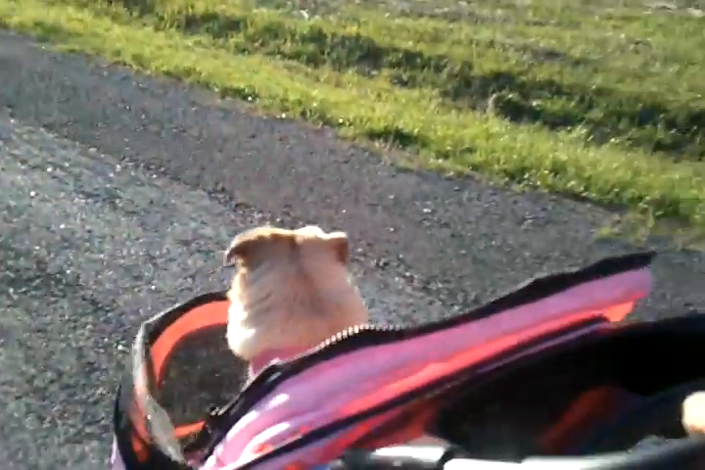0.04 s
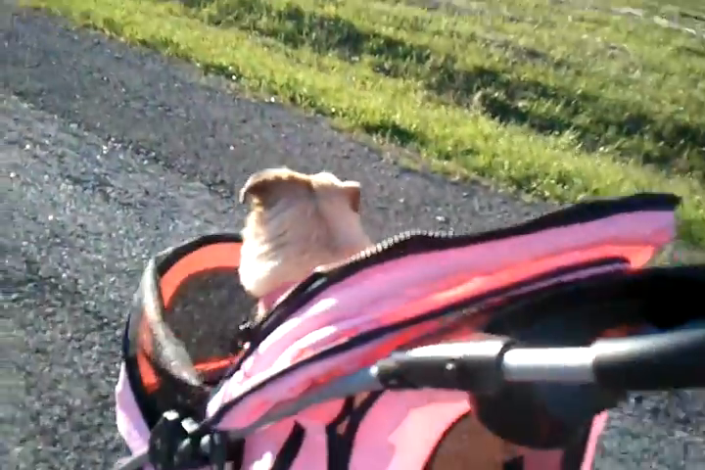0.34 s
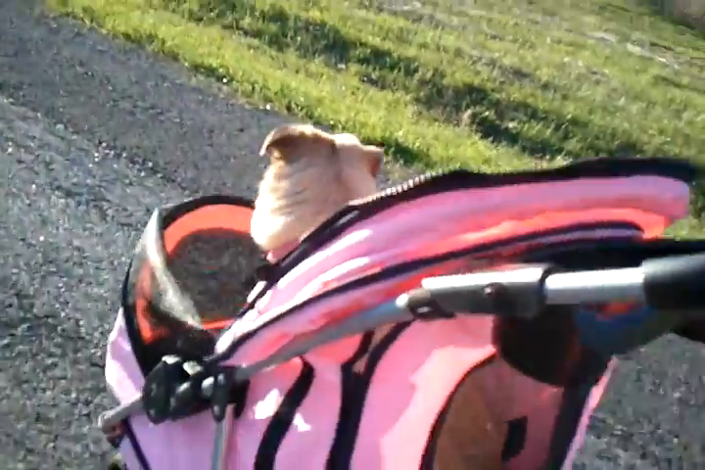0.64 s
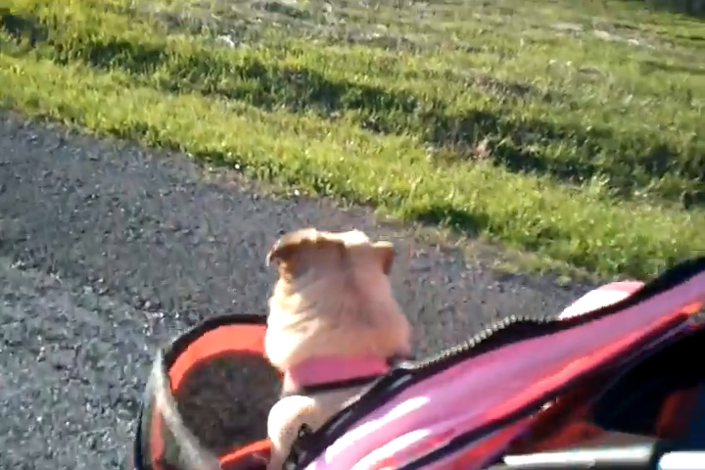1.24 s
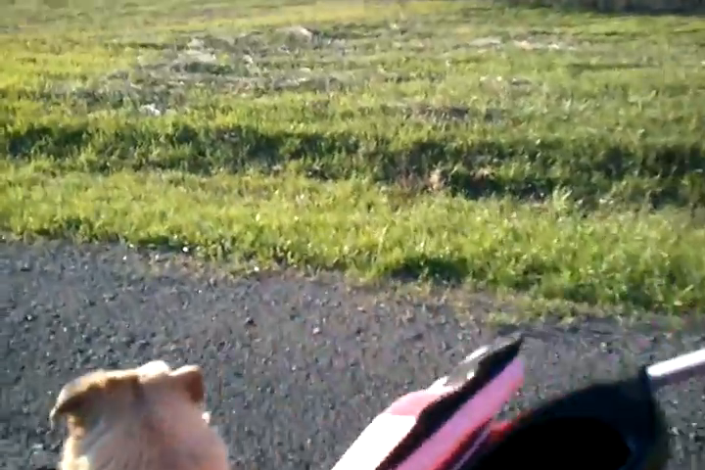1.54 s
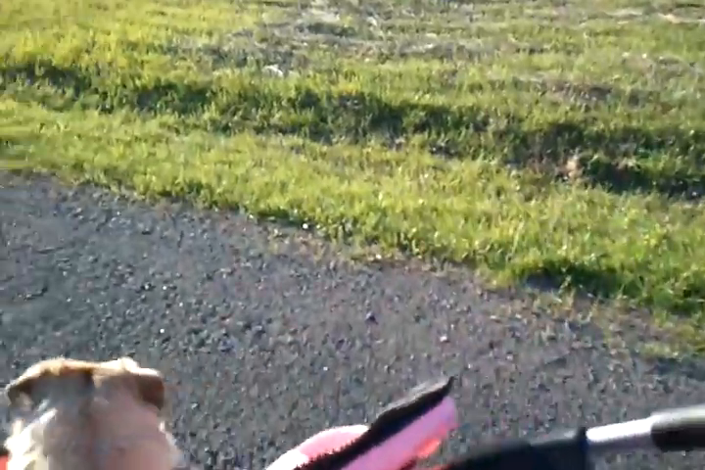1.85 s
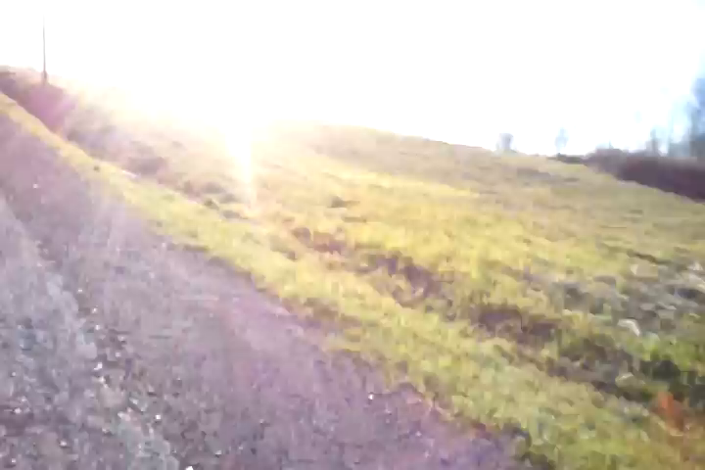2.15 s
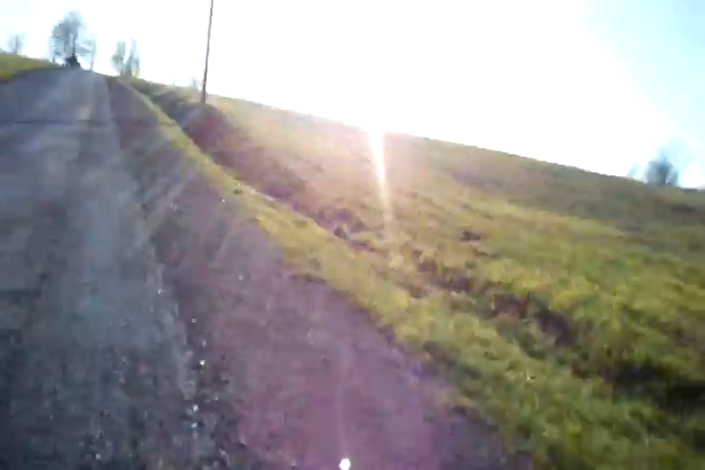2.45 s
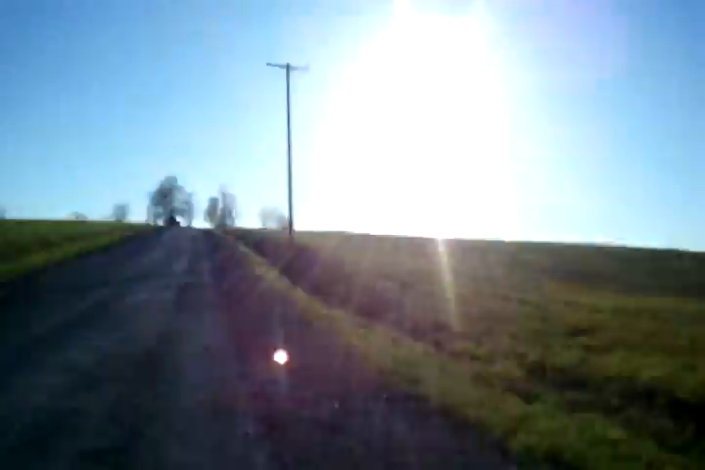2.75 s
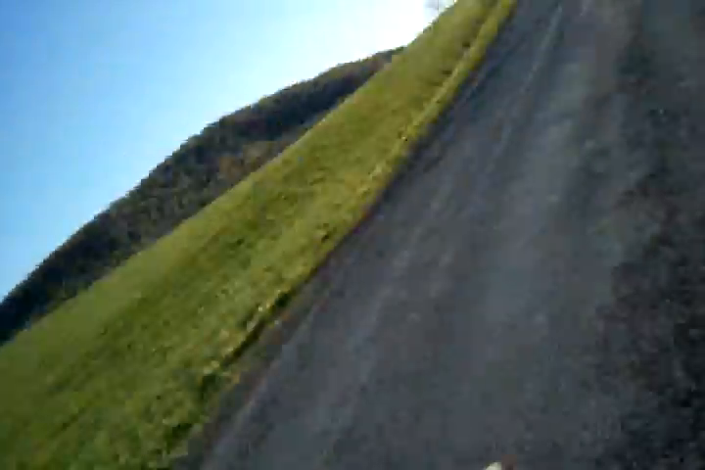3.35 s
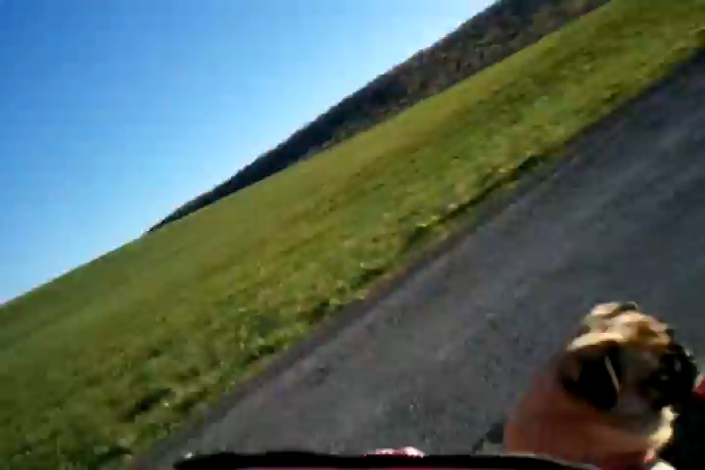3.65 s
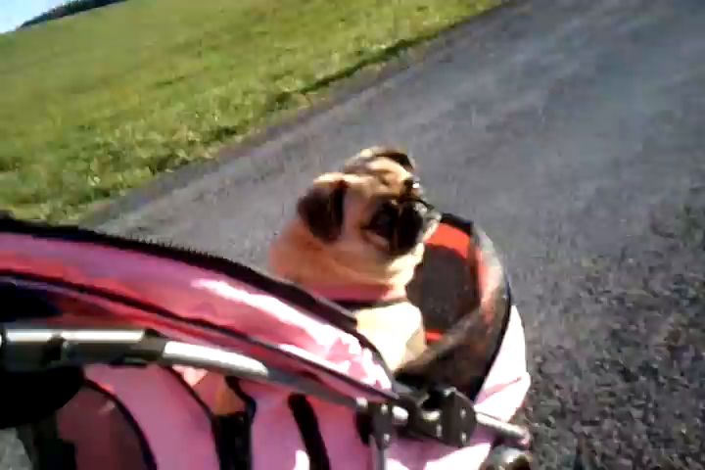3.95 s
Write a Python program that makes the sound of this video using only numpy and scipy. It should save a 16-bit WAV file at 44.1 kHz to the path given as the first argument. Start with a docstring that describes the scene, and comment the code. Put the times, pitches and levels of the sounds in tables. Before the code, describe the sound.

A stroller rumbles over a gravel road throughout, with grit crunching, plastic clacks, metal clinks and faint fabric rustles and squeaks. Wind buffets the microphone for the first half second. The wheels thud over stones from about 0.8 to 2.1 seconds. Gusts return with low pops from 2.3 to 3.7 seconds, the rattling grows busier around 3, and a sharp plastic clack comes near 3.8.

```python
"""A gravelly country road, with a stroller being pushed along it. Stones bump the wheels so the frame
rumbles, the tyres roar and grit crunches under them. Plastic joints clack and squeak, tubes knock,
a small metal fitting clinks, and the fabric hood rustles among short hollow scuffs.
Gusts buffet the microphone with low pops and flutter, and overload it."""
import sys
import numpy as np
from scipy import signal
from scipy.fft import rfft, irfft, next_fast_len
from scipy.io import wavfile
from scipy.ndimage import uniform_filter1d, map_coordinates

SR = 44100
rng = np.random.default_rng(int(sys.argv[2]) if len(sys.argv) > 2 else 0)


def wav_out(sig):
    """Save sig, one row per channel (or a flat mono array), as 16-bit PCM at SR to the path in sys.argv[1]."""
    wavfile.write(sys.argv[1], SR, np.round(np.clip(np.atleast_2d(sig).T, -1, 1) * 32767).astype(np.int16))


N = 176400

# Bright spectrum of a hard strike, on metal or plastic: freq_hz, gain_db
SNAP_EQ = [(200,-35),(1500,-10),(2800,-0.5),(4000,2),(5500,7),(7000,4.5),(9000,-33)]


def amp(db):
    """Decibels to gain."""
    return 10 ** (np.asarray(db) / 20)


def unit(x):
    """Scale to rms 1."""
    return x / np.sqrt(np.mean(x ** 2) + 1e-20)


def curve(rows):
    """One value per sample from (time_s, value) rows."""
    return np.interp(np.arange(N) / SR, *np.transpose(rows))


def wobble(rate):
    """A smooth random curve, rate knots a second."""
    return map_coordinates(rng.standard_normal(4000), [np.arange(N) * rate / SR], mode="wrap")


def arch(length_s):
    """A rounded fade in and out."""
    return np.sqrt(np.abs(np.hanning(int(length_s * SR))))


def filtered(x, response):
    """Filter x by a gain given as a function of frequency."""
    size = next_fast_len(len(x) + 8192)
    return irfft(rfft(x, size) * response(np.fft.rfftfreq(size, 1 / SR)), size)[:len(x)]


def coloured(x, eq):
    """x shaped by (freq_hz, gain_db) points, at rms 1."""
    freqs, db = np.transpose(eq)
    return unit(filtered(x, lambda hz: amp(np.interp(np.log(hz + 1), np.log(freqs), db))))


def noise(eq):
    """Coloured noise of rms 1."""
    return coloured(rng.standard_normal(N), eq)


def impacts(rate, spread_db):
    """Random impulses of uneven size, rate a second."""
    hits = rng.random(N) < rate / SR
    signs = rng.choice([-1, 1], N)
    return unit(hits * signs * amp(spread_db * np.minimum(rng.exponential(size=N), 2)))


def add(out, start_s, x):
    """Mix x into out from start_s."""
    i = max(round(start_s * SR), 0)
    out[i:i + len(x)] += x[:max(N - i, 0)]


def gusts(bright_hz=170, bright_db=-9, buffet_db=0.5):
    """Turbulence on the microphone: a deep buffet and a brighter layer surge together."""
    # Strength of the wind: time_s, level_db
    strength = [(0,-8.5),(.06,-18),(.12,-11),(.19,-19.5),(.3,-13.5),(.4,-16),(.47,-15),(.56,-31.5),(.77,-25.5),(.97,-35),(1.04,-27),(1.4,-29.5),(1.64,-32.5),(1.87,-23.5),(1.95,-37),(2.22,-31.5),(2.31,-19.5),(2.37,-12),(2.425,-28),(2.48,-13),(2.58,-14.5),(2.76,-14),(2.9,-24),(2.98,-22),(3.1,-13.5),(3.15,-29),(3.25,-30.5),(3.31,-17),(3.38,-60),(3.55,-25.5),(3.62,-11),(3.69,-23.5),(3.9,-40),(4,-34)]
    # Spectrum of the turbulence: freq_hz, gain_db
    buffet_eq = [(10,-29),(22,13.5),(40,12),(85,5),(150,-3),(230,-19.5),(350,-26.5),(600,-43.5),(1500,-69),(4000,-92)]
    buffet = noise(buffet_eq)
    local_power = np.abs(uniform_filter1d(buffet ** 2, size=1800))
    buffet = unit(buffet / np.sqrt(local_power + .15))  # even out the noise's own swells
    bright = unit(filtered(noise(buffet_eq), lambda hz: hz ** 2 / (hz ** 2 + bright_hz ** 2)))
    return amp(curve(strength)) * (amp(buffet_db) * buffet + amp(bright_db) * bright)


def eddies(width_cycles=0.61, lean_rad=0.25):
    """Eddies shed by the gusts pop on the microphone: they suck, then push sharply."""
    # Pressure pops: centre_s, level_db, pitch_hz, steepness (0-1)
    pops = [(.031,-7.5,130,0),(0.088,-6.5,55,0.5),(0.138,-1,188,0.39),(0.211,-3,63,0),(.2665,-7.5,120,0.33),(0.369,-2.5,139,0),(2.35,-5.5,187,0.27),(2.373,-3,50,0),(2.464,-6.5,59,0.45),(2.521,-4,140,0.35),(2.568,-7,206,0.3),(2.592,-3,115,.3),(2.614,-2,95,0),(2.6826,-3.5,154,0.42),(2.73,-10.5,260,0.3),(2.743,-1.5,70,0.23),(2.779,-1.5,142,.33),(2.857,-5,84.4,0.38),(2.942,-7,223,0.06),(3.018,-2,128,0.32),(3.172,-7.5,50,0.07),(3.276,-0.5,151,0.17),(3.6116,-3,111,0.33),(3.626,-10.5,69.4,0.02)]
    out, t = np.zeros(N), np.arange(-SR // 20, SR // 20) / SR
    for centre_s, db, hz, steep in pops:
        wave = np.cos(2 * np.pi * hz * t - lean_rad)
        swing = (1 - steep) * (wave - steep) / (1 - 2 * steep * wave + steep ** 2)  # narrows the crest
        add(out, centre_s + t[0], amp(db) * swing * np.exp(-(hz * t / width_cycles) ** 2))
    return out


def flutter(hz=180, wander=0.3, depth=0.29):
    """Vortices leave the microphone port at an unsteady rate in the strongest gusts."""
    # Bursts of fluttering air: start_s, length_s, level_db
    bursts = [(0,0.03,-19.5),(0.346,.04,-26),(2.506,.12,-15.5),(2.639,0.025,-17),(2.738,0.017,-16.5),(3.026,0.066,-21.5),(3.582,0.098,-20)]
    swell = np.zeros(N)
    for start_s, length_s, db in bursts:
        add(swell, start_s, amp(db) * arch(length_s))
    pitch_hz = hz * np.exp(wander * wobble(160))
    tremor = 1 + depth * wobble(110)
    return swell * np.sqrt(2) * tremor * np.sin(2 * np.pi * np.cumsum(pitch_hz) / SR)


def hood():
    """The hood's fabric rubs in soft, flickering swells."""
    # Fabric rubs: start_s, length_s, level_db
    rubs = [(0.25,0.44,-45),(1.13,.13,-47),(1.51,0.16,-47.5),(2.366,0.13,-45.5),(2.746,0.16,-46.5),(3.253,0.13,-45),(3.396,0.26,-41.5),(3.615,0.24,-43.5)]
    # Spectrum of the rustle: freq_hz, gain_db
    fabric_eq = [(300,-25.5),(1300,-18),(2100,7),(2600,2),(3400,-6),(5000,-4),(8000,-31.5)]
    swell = np.zeros(N)
    for start_s, length_s, db in rubs:
        add(swell, start_s, amp(db) * arch(length_s))
    return swell * noise(fabric_eq) * amp(1.7 * wobble(50))


def scuffs(relative_width=0.34, slips_per_s=2000):
    """Short stick-slip rubs, each through one hollow resonance."""
    # Hollow scuffs: start_s, length_s, level_db, resonance_hz
    rubs = [(.085,0.057,-41,1050),(1.152,0.039,-39.5,1000),(1.682,0.079,-42,950),(1.717,0.12,-33.5,370),(1.806,0.015,-34,920),(2.478,0.016,-34.5,1040),(2.724,0.012,-24.5,600),(2.745,.035,-35.5,740),(3.351,0.051,-34,494),(3.426,0.056,-38,686),(3.465,0.11,-31.5,476),(3.637,0.053,-36,340),(3.904,0.048,-34.5,340)]
    out = np.zeros(N)
    for start_s, length_s, db, hz in rubs:
        swell = arch(length_s)
        slips = impacts(slips_per_s, spread_db=6.0)[:len(swell)]
        rub = filtered(slips, lambda f: 1 / (1 + ((f - hz) / (relative_width * hz)) ** 2))
        add(out, start_s, amp(db) * swell * unit(rub))
    return out


def squeaks(length_s=.02, waver=0.017, roughness=0.57, gain_db=-3):
    """A dry joint gives tiny rough chirps."""
    # Joint squeaks: start_s, pitch_hz, level_db
    chirps = [(.301,4280,-35),(.33,5300,-35),(.872,5370,-34),(0.958,5600,-38),(2.948,5550,-41),(2.965,5420,-35),(3.086,4350,-35),(3.362,5620,-34),(3.623,5300,-32)]
    out, swell = np.zeros(N), np.hanning(int(length_s * SR))
    drift = 1 + waver * wobble(1000)
    grip = 1 + roughness * wobble(420)
    for start_s, hz, db in chirps:
        span = slice(int(start_s * SR), int(start_s * SR) + len(swell))
        tone = np.sin(2 * np.pi * np.cumsum(hz * drift[span]) / SR)
        add(out, start_s, amp(db + gain_db) * swell * grip[span] * tone)
    return out


def knocks(gain_db=-5, pivot_hz=1500):
    """The frame's tubes knock with a short hollow ring."""
    # Knocks on the frame: start_s, level_db, tilt_db_per_octave
    hits = [(2.97,-32.5,4),(3.076,-25,-12),(3.085,-23,-11),(3.172,-23.5,3),(3.232,-29,4),(3.456,-33,18.5)]
    # Modes of a tube: pitch_hz, level_db, t60_s
    modes = [(1040,-7,0.043),(1312,2.5,0.031),(1433,-3.5,0.033),(2015,-2.5,.04),(2880,-7,0.022),(3030,-4.5,0.033)]
    out, t = np.zeros(N), np.arange(SR // 10) / SR
    for start_s, db, tilt in hits:
        for hz, mode_db, t60 in modes:
            scatter_db, phase = rng.standard_normal(2)
            level_db = db + gain_db + mode_db + scatter_db + tilt * np.log2(hz / pivot_hz)
            add(out, start_s, amp(level_db - 60 * t / t60) * np.sin(2 * np.pi * (hz * t + phase)))
    return out


def clinks(strike_t60=0.0079, strike_gain_db=-7, ring_gain_db=-2, bounce_s=.004, bounce_db=-11.5):
    """A small metal fitting is struck, bounces once and rings briefly."""
    # Hits on the fitting: start_s, strike_db, ring_db
    hits = [(0.3418,-19,-31),(1.232,-21,-31),(1.401,-17.5,-29),(1.7718,-18,-30),(1.876,-28,-24),(1.929,-32,-35.5),(2.303,-39,-30.5),(2.473,-21,-22.5),(2.499,-34,-32),(2.841,-15,-23.5),(2.890,-22,-27),(3.168,-11.5,-11),(3.226,-17,-22.5),(3.26,-44,-33),(3.4545,-24,-21),(3.482,-17,-22.5),(3.501,-16.5,-44),(3.5346,-27,-20),(3.727,-30,-24.5),(3.801,-45,-34)]
    # Modes of the fitting: pitch_hz, level_db, t60_s
    modes = [(1450,-12,0.02),(2816,-15,0.061),(3124,-18,0.074),(4980,-1,0.04),(5210,-16,.03),(5620,1.5,0.01),(6440,-17.5,0.047)]
    ring, strike, t = np.zeros(N), np.zeros(N), np.arange(SR // 10) / SR
    for start_s, strike_db, ring_db in hits:
        rebound_s = start_s + bounce_s * (.5 + rng.random())
        for at_s, loss_db in (start_s, 0), (rebound_s, bounce_db):
            add(strike, at_s, amp(strike_db + strike_gain_db + loss_db - 60 * t / strike_t60))
            for hz, mode_db, t60 in modes:
                scatter, phase = rng.standard_normal(2)
                level_db = ring_db + ring_gain_db + loss_db + mode_db + 2 * scatter
                add(ring, at_s, amp(level_db - 60 * t / t60) * np.sin(2 * np.pi * (hz * t + phase)))
    return ring + strike * noise(SNAP_EQ)


def clacks(gain_db=-6, touch_lead_s=0.0038, touch_db=-12):
    """Plastic joints touch lightly, then knock: a bright snap over a hollow body."""
    # Hits in the joints: start_s, level_db, body_vs_snap_db, t60_s
    hits = [(0.099,-29.5,-7,0.016),(.267,-23.5,-31,0.034),(0.363,-25,-3,0.02),(0.465,-28,-12,0.016),(.725,-30.5,10.5,0.014),(0.745,-28,-3,0.042),(.807,-35.5,2.5,0.06),(.959,-27,1,.012),(1.062,-43.5,15.5,.025),(1.124,-24,-2,0.02),(1.3334,-18.5,-21,0.007),(1.447,-24,-22,.008),(1.559,-21.5,-6,0.016),(1.6073,-11.5,-9,0.017),(1.635,-18.5,-4,0.0095),(1.683,-22,-15,0.017),(1.866,-22.5,-22,0.013),(2.483,-28.5,7,0.034),(2.7026,-30.5,12.5,0.01),(3.078,-26.5,8,0.078),(3.166,-19,-11,.007),(3.448,-23.5,-12,0.013),(3.508,-21,-8,.012),(3.7881,2,-9,0.0036),(3.7878,-8.5,2,0.008),(3.851,-10,-20,0.0069),(3.8559,-18,-14,0.016),(3.931,-23.5,-9,0.019),(3.967,-20.5,-19,.01),(3.978,-19.5,-13,0.0071)]
    # Spectrum of the hollow plastic: freq_hz, gain_db
    body_eq = [(100,-15.5),(500,4.5),(900,-3.5),(1350,2.5),(1800,-3),(2700,1),(3700,-4),(5000,-20.5),(8000,-33.5)]
    snap, body, t = np.zeros(N), np.zeros(N), np.arange(SR // 15) / SR
    for start_s, db, body_db, t60 in hits:
        blow = amp(db + gain_db - 60 * t / t60)
        add(snap, start_s - touch_lead_s, amp(touch_db) * blow)
        add(snap, start_s, blow)
        add(body, start_s, amp(body_db) * blow)
    return snap * noise(SNAP_EQ) + body * noise(body_eq)


def grit(hiss_db=1, grain_db=-3, grain_t60=.006):
    """Fine grit hisses under the tyres while coarser grains crackle."""
    # Strength of the crunch: time_s, level_db
    crunch = [(0.0, -50.5), (0.29, -49), (0.5, -46.5), (0.98, -50.5), (1.17, -49), (1.34, -43.5),
              (1.5, -45), (1.77, -45), (2.02, -48.5), (2.26, -48.5), (3.01, -45.5), (3.26, -47.5),
              (4.0, -43)]
    # Spectrum of the grit: freq_hz, gain_db
    grit_eq = [(200,-14.5),(600,3),(1000,0.5),(1600,3),(2500,4.5),(3500,1.5),(4500,1),(5600,4.5),(6800,0.5),(8000,-19.5)]
    t = np.arange(SR // 50) / SR
    power_decay = amp(-120 * t / grain_t60)
    grain_power = signal.fftconvolve(impacts(rate=140, spread_db=10.0) ** 2, power_decay)[:N]
    grains = unit(np.sqrt(np.abs(grain_power)) * noise(grit_eq))
    level = amp(curve(crunch) + 1.3 * wobble(30))
    return level * (amp(hiss_db) * noise(grit_eq) + amp(grain_db) * grains)


def tyres(gain_db=-1.0):
    """Dense small impacts of stones on the tyres merge into a low roar."""
    # Strength of the roar: time_s, level_db
    roll = [(0,-47),(.4,-43),(.95,-46),(1.3,-43),(1.77,-41),(2.0,-46),(2.26,-46.5),(2.55,-43),(2.9,-42),(3.15,-47),(3.33,-44),(3.52,-38),(3.75,-41),(4,-41)]
    # Spectrum of the rolling tyres: freq_hz, gain_db
    roar_eq = [(100,-11.5),(250,-2),(400,0),(600,-4),(1000,-5),(1600,-17.5),(3000,-20.5),(8000,-59.5)]
    roar = coloured(impacts(rate=1500, spread_db=4.5), roar_eq)
    return amp(curve(roll) + gain_db + 1.3 * wobble(24.98)) * roar


def bumps(hz=62, t60=0.083, rise_s=0.0039):
    """A wheel drops over a stone and the frame bounces once or twice."""
    # Wheel drops: start_s, level_db
    drops = [(.758,-13),(0.846,-22),(0.931,-16),(1.017,-14.5),(1.121,-16.5),(1.307,-15),(1.364,-13),(1.704,-15.5),(1.858,-14),(2.123,-18)]
    out, t = np.zeros(N), np.arange(SR // 8) / SR
    for start_s, db in drops:
        envelope = 2 * amp(db - 60 * t / t60) * (1 - np.exp(-t / rise_s))
        pitch_hz = hz * (1 + 0.15 * rng.standard_normal())
        add(out, start_s, envelope * np.sin(2 * np.pi * pitch_hz * t))
    return out


def frame(level_db=-29, lowpass_hz=600):
    """Stones jolt the wheels and the frame rumbles in its low resonances."""
    # Modes of the frame: pitch_hz, width_hz, gain_db
    modes = [(54.7,36.5,1.5),(124.3,39.2,2),(198.4,42,-1.5),(308,38.7,-6),(373.5,80,-14.5)]

    def response(f):
        peaks = sum((-1) ** k * amp(db) * 1j * f * width / (hz * hz - f * f + 1j * f * width)
                    for k, (hz, width, db) in enumerate(modes))
        return peaks / (1 + (f / lowpass_hz) ** 2)

    jolts = impacts(rate=260, spread_db=3.5)
    return amp(level_db) * unit(filtered(jolts, response))


def scene():
    """The stroller and the wind at one microphone."""
    rolling = frame() + tyres() + bumps() + grit() + hood() + scuffs()
    rattle = clinks() + clacks() + knocks() + squeaks()
    wind = gusts() + eddies() + flutter()
    return (wind + rolling + rattle)[None]


def record(dry, offset=-.133, ceiling=.72, top_hz=7350):
    """The microphone's input sits off centre, soft-clips the gusts and cuts the top end steeply."""
    shifted = dry[0] + offset
    clipped = shifted / (1 + np.abs(shifted / ceiling) ** 8) ** (1 / 8)
    return filtered(clipped, lambda hz: 1 / np.sqrt(1 + (hz / top_hz) ** 100))[None]


dry = scene()
out = record(dry)
wav_out(out)
```